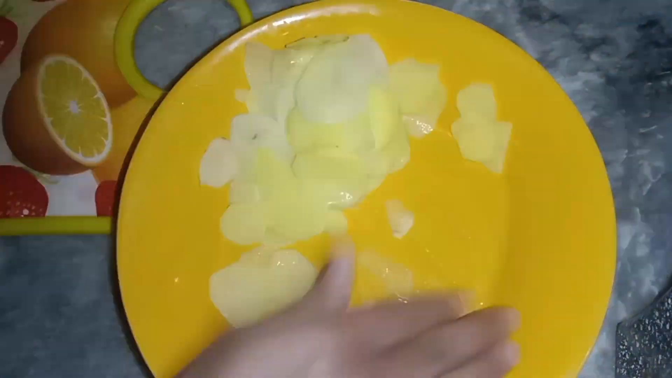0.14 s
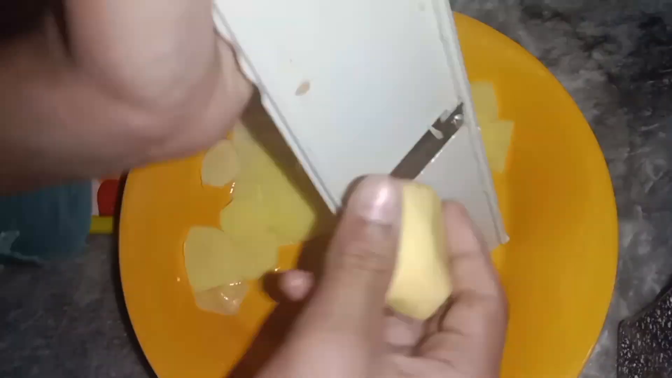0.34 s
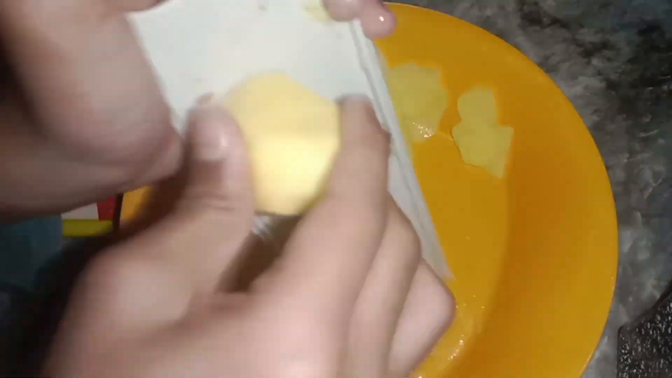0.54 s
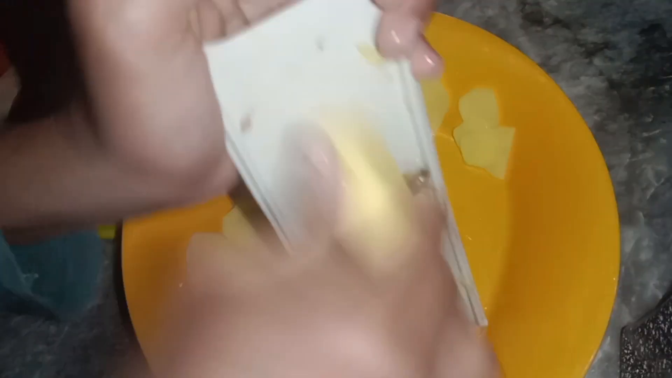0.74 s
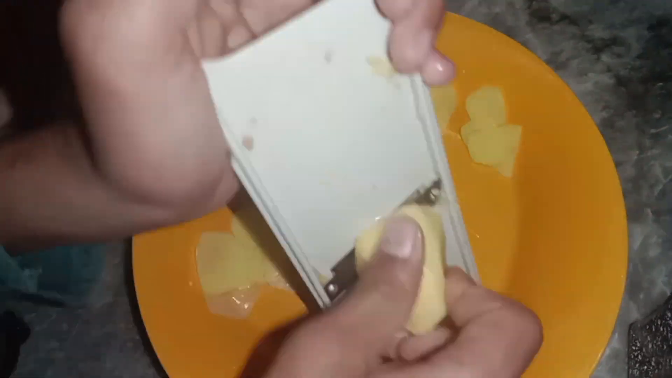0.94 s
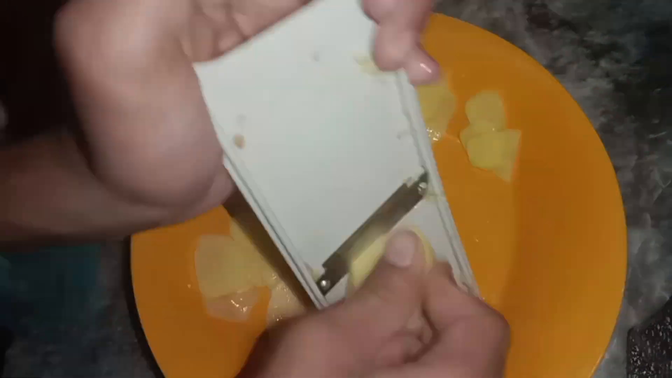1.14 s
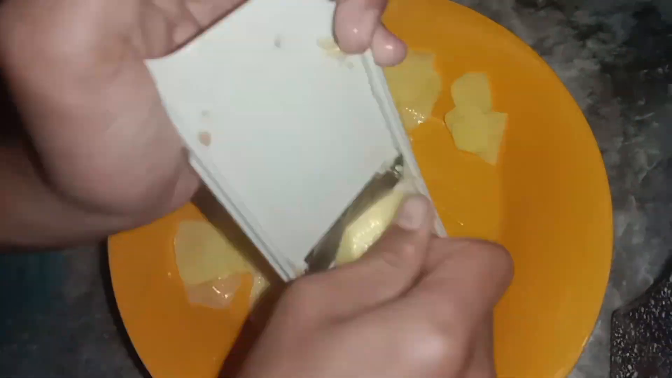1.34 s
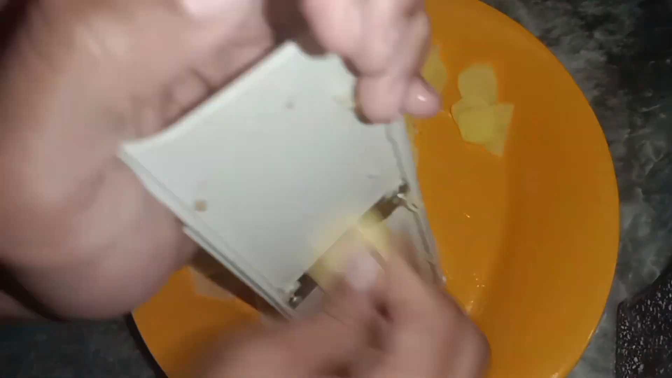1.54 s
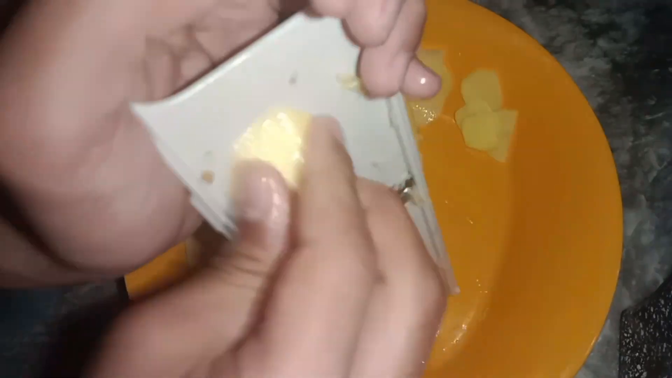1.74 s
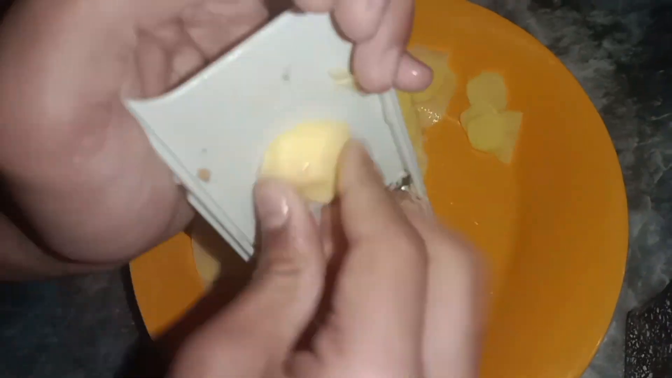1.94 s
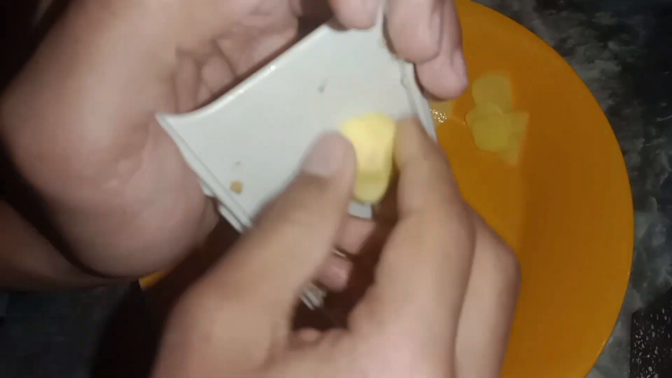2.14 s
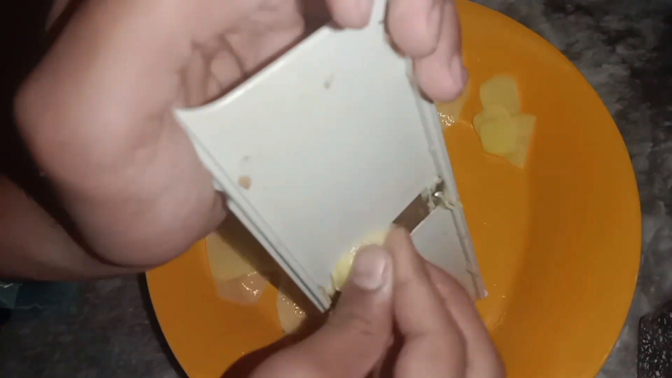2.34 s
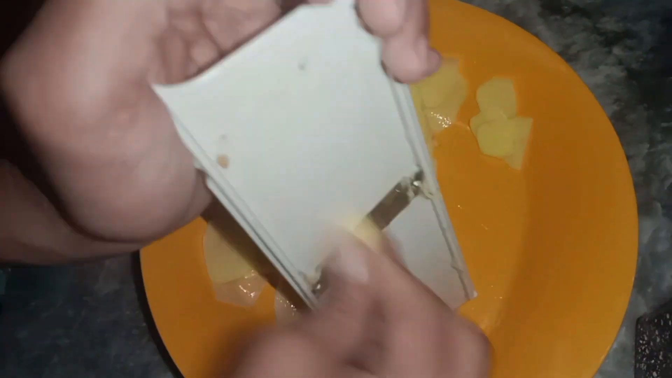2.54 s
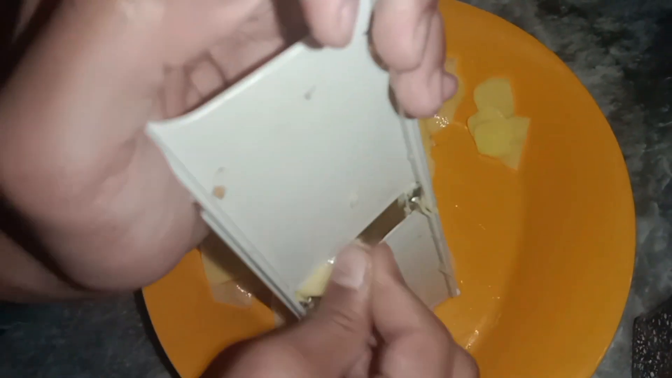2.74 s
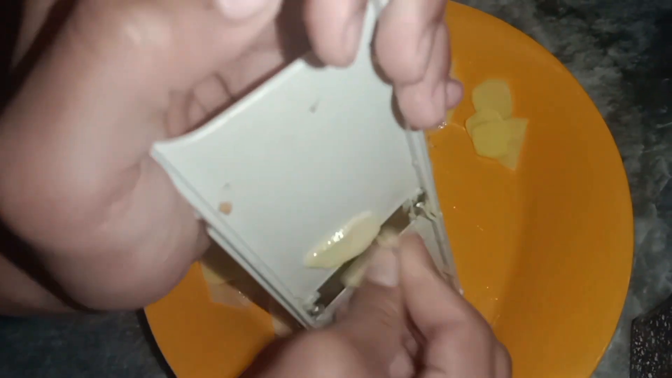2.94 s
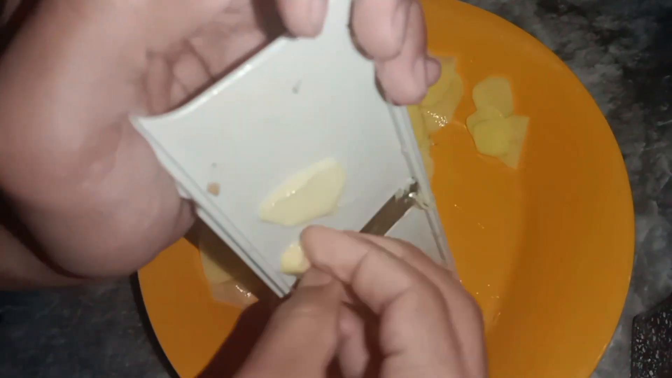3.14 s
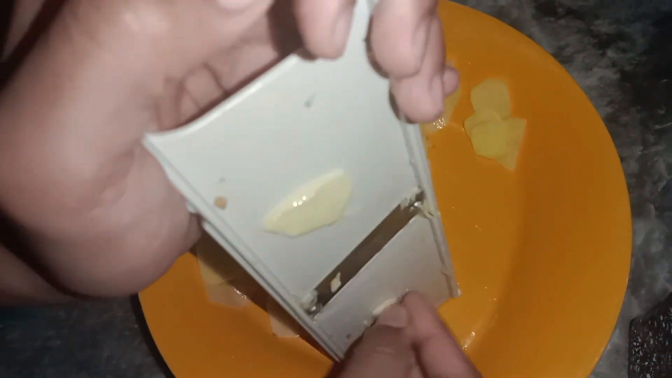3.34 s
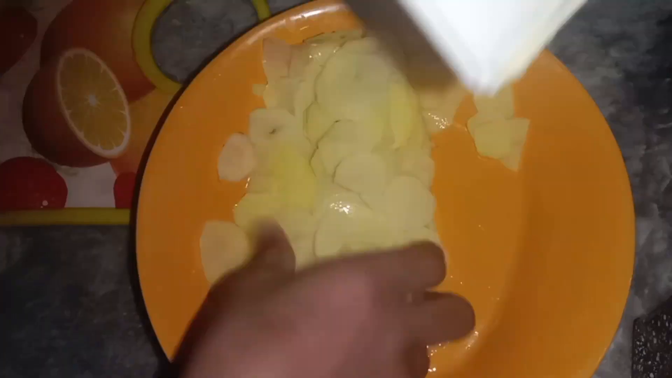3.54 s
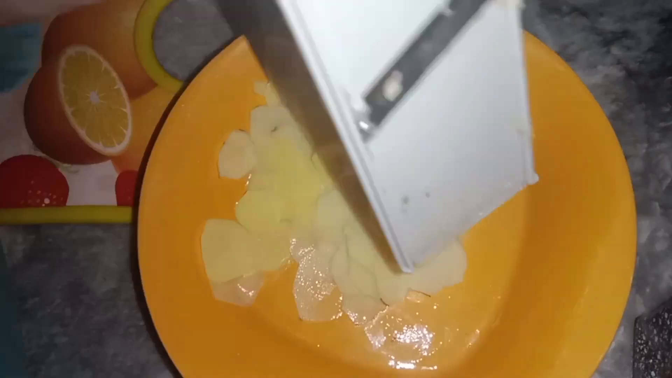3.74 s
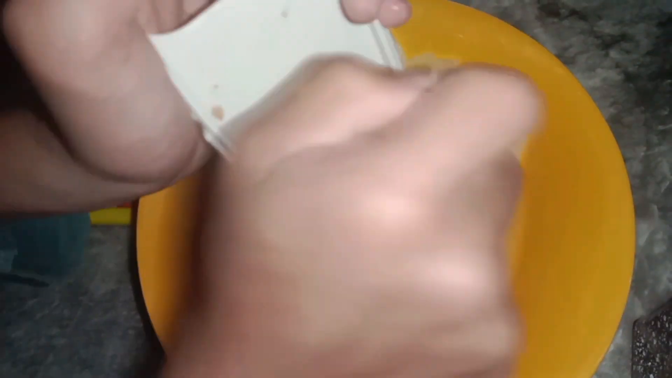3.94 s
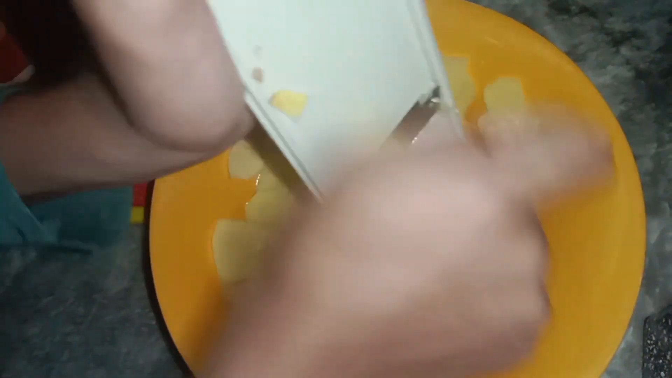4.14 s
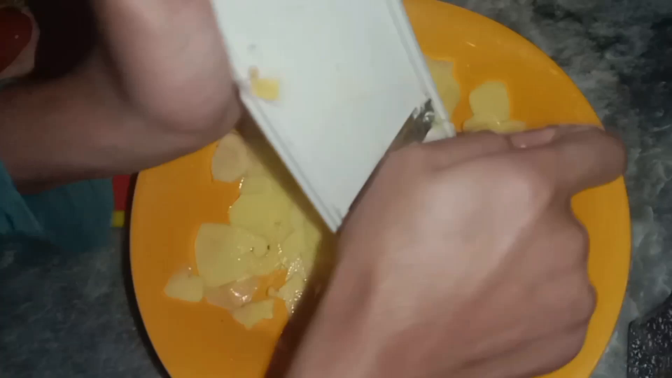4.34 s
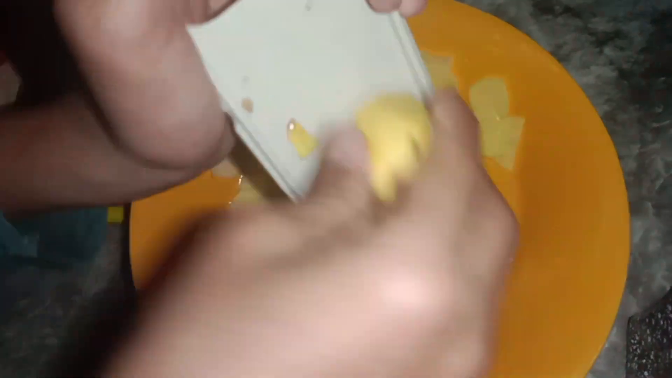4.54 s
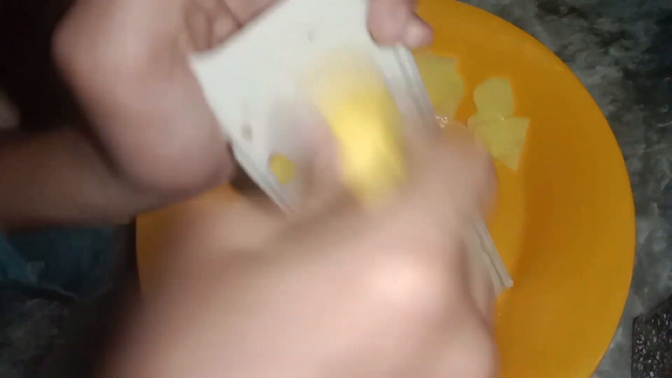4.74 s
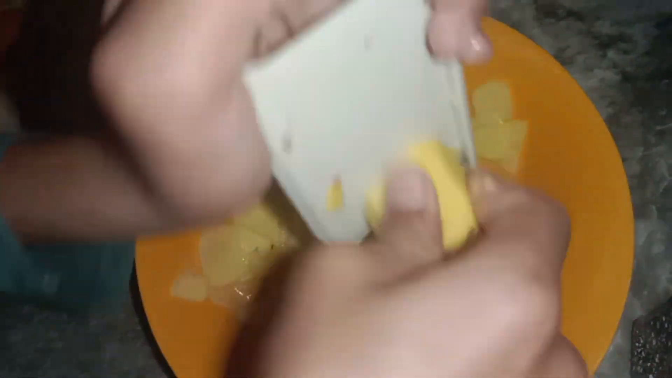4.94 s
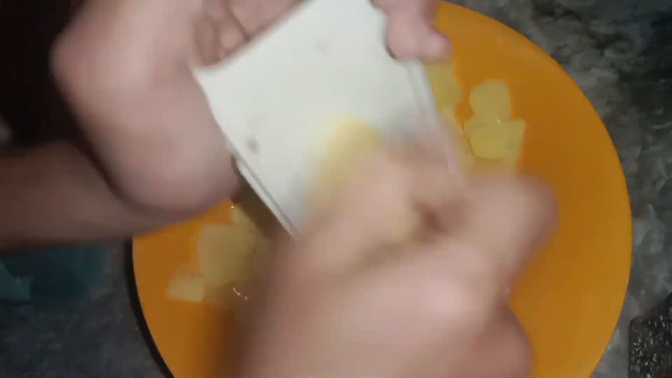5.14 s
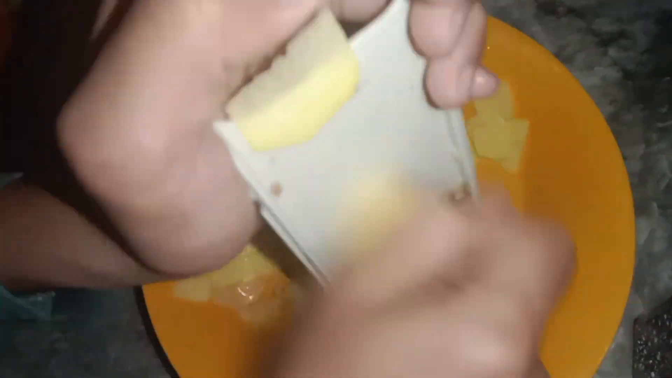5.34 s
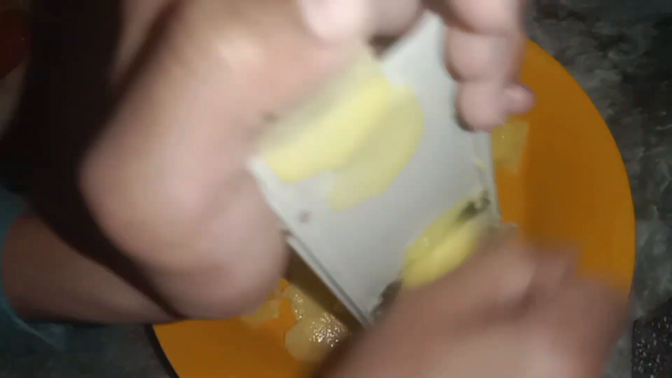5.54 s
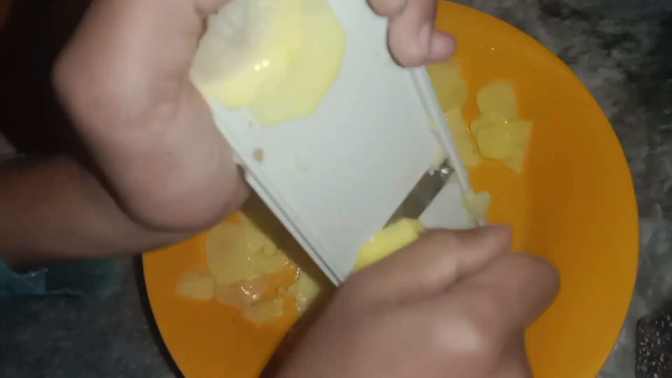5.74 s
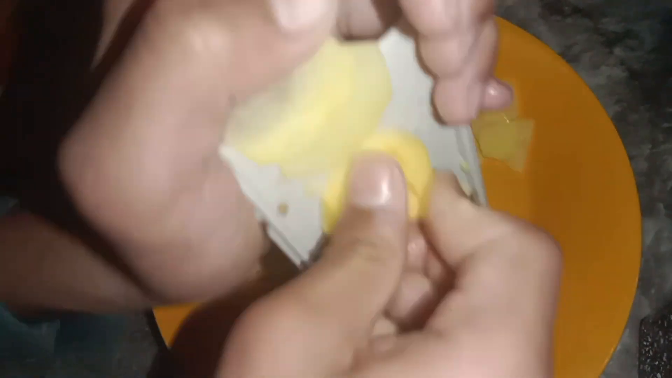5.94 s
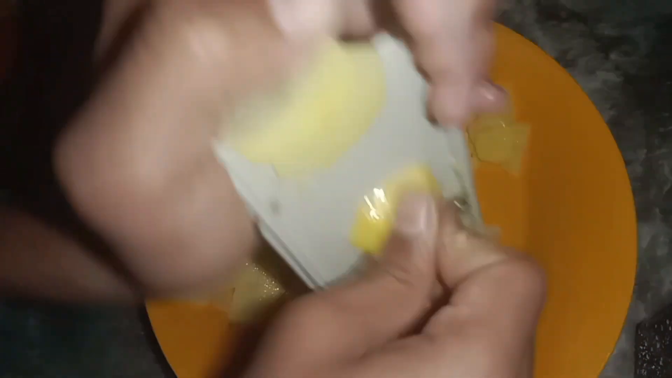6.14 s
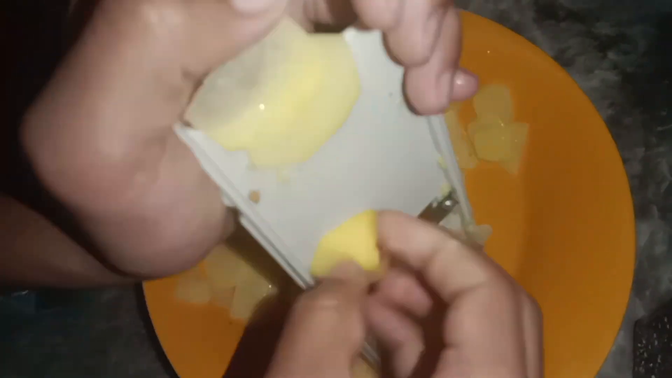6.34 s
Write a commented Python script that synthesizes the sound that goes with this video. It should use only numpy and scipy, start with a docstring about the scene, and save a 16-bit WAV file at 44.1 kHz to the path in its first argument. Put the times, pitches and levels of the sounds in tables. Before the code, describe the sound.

Very close and dry in a quiet kitchen, a raw potato is pushed over a hand-held plastic slicer. Near silence first, then a burst of rasping strokes with crisp snaps and chattering catches. Quieter flicks and dry knocks follow, fading almost away, until a low thud on the plate starts a louder run of scraping and stuttering slips that dwindles to tiny rubs.

```python
"""In a quiet kitchen, a raw potato is pushed to and fro over a hand-held plastic mandoline, close by.
Strokes and flicks are bursts of coloured crackle and noise: a rasp on the ramp, a hiss at the blade, a drone.
Catches are runs of jerks that ring the frame; snaps and dry knocks are short bursts through filters.
Hollow rubs, scuffs and a dull rumble follow the hands; low swings give the soft bumps and the thud on the plate."""
import sys
import numpy as np
from scipy import signal
from scipy.fft import rfft, irfft, next_fast_len
from scipy.io import wavfile
from scipy.ndimage import uniform_filter1d, map_coordinates

SR = 44100
rng = np.random.default_rng(int(sys.argv[2]) if len(sys.argv) > 2 else 0)


def bounce(signal):
    """Save signal as a 16-bit WAV file at the path given by the first command-line argument."""
    frames = np.transpose(np.atleast_2d(signal))
    limited = np.clip(frames, -1, 1)
    pcm = np.round(limited * 32767).astype(np.int16)
    wavfile.write(sys.argv[1], SR, pcm)


N = 285765  # length in samples
TOP_HZ = 15800  # upper band limit of the microphone

# how fast the kitchen's answer dies: [f/Hz, t60/s]
ROOM_DECAY = [(200, .16), (1500, 0.17), (8000, 0.18)]
# spells in which the hands shift their grip: [start t/s, end t/s, effort level/dB, swell over the spell/dB]
GRIP_SPELLS = [(.01, 0.393, -68.5, 15), (0.407, 0.757, -47, 5.5), (0.765, 0.943, -40, -12),
               (1.05, 1.45, -43, 5.5), (1.52, 1.867, -80, 1.5), (1.862, 2.042, -64.5, 15),
               (2.33, 2.827, -62, -22), (2.851, 3.746, -56.5, -1.5), (3.866, 4.209, -35, 8.5),
               (4.252, 4.441, -49.5, -17), (4.477, 4.756, -57.5, 3), (4.77, 5.025, -40.5, -4.5),
               (5.059, 5.78, -42.5, -4.5), (5.81, 6.11, -58, 16), (6.346, 6.48, -64.5, -2.5)]
# the clearest hollow rubs: [t/s, level before the rub trim/dB, f/Hz]
CLEAR_RUBS = [(.404, -38, 615), (0.938, -34.5, 585), (1.285, -30.5, 556), (1.429, -41, 676),
              (1.578, -43.5, 634), (1.96, -57, 713), (2.209, -46.5, 585), (2.35, -47.5, 282),
              (2.656, -51, 363), (2.762, -44, 410), (3.11, -44, 865), (3.155, -49, 694), (3.34, -52, 696),
              (3.39, -46, 219), (3.653, -41.5, 550), (3.936, -39, 306), (4.429, -42, 692), (4.28, -41, 448),
              (4.447, -45.5, 405), (4.83, -39, 500), (5.306, -43.5, 201), (5.355, -33.5, 573),
              (5.478, -31.5, 606), (5.946, -41.5, 770), (5.998, -39.5, 460), (6.075, -38, 554),
              (6.355, -61, 648), (6.463, -56, 704)]
# soft bumps of the slicer and the hands: [t/s, swing level before the onset/dB, f/Hz, t60/s]
SOFT_BUMPS = [(0.164, -39.5, 127.5, 0.061), (1.119, -41, 142, 0.036), (2.337, -38, 83, .06),
              (2.534, -31.5, 165, 0.033), (2.955, -37, 149, 0.052), (3.806, -20.5, 125, 0.069),
              (3.815, -13.5, 182, 0.12), (3.841, -15.5, 260, 0.041), (5.261, -15.5, 284, 0.025)]
# dry knocks of the potato on the frame: [t/s, peak level/dB]
DRY_KNOCKS = [(2.030, -32.5), (2.102, -23), (2.265, -63), (2.309, -30.5)]
# the blade bites in with a crisp snap: [t/s, peak level/dB, t60 of the burst/s]
BLADE_SNAPS = [(0.638, -22, 0.028), (0.742, -17.5, 0.0099), (0.757, -25.5, 0.012)]
# the potato catches and slips: [t/s, level over 10 ms/dB, f of jerks and frame focus/Hz, length before spread/s]
CATCHES = [(0.64, -13.5, 1110, 0.0019), (0.711, -23, 1211, 0.0021), (0.7417, -17.5, 1053, 0.00049),
           (0.7591, -19.5, 1168, 0.00063), (0.763, -16, 1542, 0.00095), (0.7845, -26, 1099, 0.01),
           (1.232, -29.5, 1013, 0.003), (1.261, -19, 1580, 0.0014), (3.8017, -26.5, 997, 0.003),
           (3.9808, -26.5, 1259, 0.0054), (4.114, -18.5, 1350, 0.00089), (4.1851, -26.5, 1770, 0.0016),
           (4.1884, -22.5, 1333, 0.006), (4.357, -24, 1267, 0.0045), (4.7581, -20, 1080, 0.0011),
           (4.7882, -21.5, 1170, 0.004), (4.914, -27, 1320, 0.0068), (4.95, -16.5, 1498, 0.00075),
           (5.125, -27.5, 2187, 0.001), (5.1585, -24.5, 1222, 0.0026), (5.4459, -15.5, 1850, 0.0013),
           (5.5348, -28.5, 1304, 0.0031), (5.546, -26, 1490, 0.002), (5.586, -22, 1510, 0.0014),
           (5.6317, -15.5, 1340, 0.003), (5.6559, -15, 1620, 0.0013), (5.7006, -14, 1450, 0.0015)]
# long pushes and pulls: [start t/s, end t/s, rasp level before trim/dB, hiss level before trim/dB,
# swell over the stroke/dB]
LONG_STROKES = [(0.058, 0.366, -78, -84, 2), (0.454, 0.607, -47.5, -52.5, -4.5),
                (.612, 0.735, -37.5, -43.5, 4), (0.754, 0.944, -38, -44, -7.5),
                (1.075, 1.311, -39.5, -44.5, -14.5), (1.308, 1.464, -43, -45.5, -12),
                (1.715, 1.853, -49, -52.5, 3.5), (2.409, 2.524, -45, -56, -9),
                (2.546, 2.699, -67.5, -67, -6), (2.719, 2.819, -44, -48, 20.5), (2.948, 3.05, -61, -64, -6),
                (3.236, 3.289, -65, -69, -9), (3.632, 3.731, -53, -62, -15), (3.929, 4.096, -42.5, -55, -6),
                (4.099, 4.376, -38.5, -47, -1.5), (4.643, 4.735, -42, -49, -2.5),
                (4.747, 4.852, -50, -55.5, 3), (4.863, 4.952, -30.5, -42.5, -4),
                (4.96, 5.025, -41.5, -52, 9), (5.065, 5.23, -40, -46.5, -5.5),
                (5.239, 5.404, -39.5, -47.5, -7.5), (5.423, 5.51, -42, -47.5, -7.5),
                (5.556, 5.803, -38, -50, -12), (5.883, 5.925, -59.5, -61, 0),
                (5.909, 6.054, -49, -54, -6.5)]
# short flicks over the blade: [middle t/s, length/s, rasp level before trim/dB, hiss level before trim/dB]
SHORT_FLICKS = [(0.111, 0.018, -66.5, -73.5), (.17, 0.018, -61.5, -83), (0.259, 0.036, -70, -73.5),
                (0.315, .014, -57, -74), (0.423, 0.032, -54, -71), (0.496, 0.018, -44, -48.5),
                (0.713, 0.0087, -29.5, -36.5), (1.058, 0.014, -36.5, -41.5), (1.15, 0.01, -39.5, -41.5),
                (1.429, 0.01, -43, -33.5), (1.53, 0.023, -44, -43.5), (1.582, 0.049, -44, -46),
                (1.663, 0.0066, -43.5, -55.5), (1.768, 0.0063, -34, -36), (1.828, .024, -39, -45.5),
                (2.01, 0.016, -42, -54.5), (2.2, 0.031, -47.5, -61), (2.337, 0.019, -41.5, -46.5),
                (2.49, 0.0097, -40.5, -41.5), (2.576, 0.021, -46, -46.5), (2.621, 0.036, -56, -52),
                (2.671, 0.023, -43, -42.5), (2.89, 0.013, -49, -48), (2.917, 0.0088, -49.5, -55.5),
                (3.153, 0.015, -68, -77), (3.215, 0.014, -41.5, -45), (3.342, 0.027, -77, -68),
                (3.428, 0.016, -47, -58), (3.544, 0.022, -63, -70.5), (3.732, 0.015, -43.5, -49),
                (3.818, .045, -35, -53.5), (4.342, .04, -35.5, -47.5), (4.602, 0.031, -41, -47.5),
                (5.123, .018, -35.5, -43.5), (5.195, 0.014, -32, -39), (5.431, 0.036, -50, -47.5),
                (5.737, .016, -31.5, -38.5), (5.791, 0.018, -47, -49), (5.979, .01, -30.5, -38),
                (6.017, 0.003, -36.5, -43.5), (6.043, .006, -64, -42.5), (6.082, 0.01, -31, -36.5),
                (6.121, 0.03, -47, -45.5), (6.17, 0.022, -40.5, -37.5), (6.441, 0.005, -49, -51)]

# colour of hollow drone, rumble and puff: [f/Hz, relative level/dB]
HOLLOW_COLOUR = [(30, -33.5), (80, -15), (160, -3), (260, -15), (450, 0), (720, -6), (950, -12.5),
                 (1500, -20.5), (3000, -71.5)]
# colour of flesh on the ramp and of finger scuffs: [f/Hz, relative level/dB]
RASP_COLOUR = [(30, -32), (70, -19), (150, -3), (300, -14), (600, -4.5), (900, -5.5), (1300, 3),
               (1700, -1.5), (2200, 3.5), (2700, -7.5), (3300, -12), (4500, -29), (8000, -61.5)]
# colour of wet flesh at the blade: [f/Hz, relative level/dB]
HISS_COLOUR = [(1000, -45.5), (2500, 2.5), (3500, -2.5), (4900, -5.5), (5500, -0.5), (6000, 7), (6600, -2),
               (7400, -4.5), (8300, -16), (9400, -42), (10500, -27.5), (15500, -29)]
# how readily the plastic frame speaks: [f/Hz, relative level/dB]
FRAME_COLOUR = [(40, -25.5), (150, -5.5), (350, 6), (600, 14.5), (850, -2.5), (1350, 0.5), (1700, -6.5),
                (2150, -1), (2650, -21.5), (3200, -11), (3800, -31.5), (6000, -24), (9000, -55),
                (15000, -62.5)]
# colour of a dry knock: [f/Hz, relative level/dB]
KNOCK_COLOUR = [(30, -20), (120, -3), (400, -1.5), (700, 7), (1200, -8.5), (1800, -36), (5000, -35),
                (9000, -70)]
# colour of a snap at the edge: [f/Hz, relative level/dB]
SNAP_COLOUR = [(800, -10.5), (2000, 1), (3500, 1), (5000, -8.5), (6000, -3), (7500, -12.5), (9400, -40.5),
               (15000, -31)]


def amp(db):
    """Decibels to linear gain."""
    return 10 ** (np.asarray(db) / 20)


def unit(x):
    """x scaled to rms 1."""
    return x / np.sqrt(np.mean(x ** 2) + 1e-20)


def along(points, hz):
    """Read a curve of (Hz, value) points on a log frequency axis."""
    f, value = np.transpose(points)
    return np.interp(np.log(hz + 1), np.log(f + 1), value)


def wobble(rate):
    """A smooth random curve with the given number of knots a second."""
    knots = rng.standard_normal(int(N * rate / SR) + 4)
    return map_coordinates(knots, [np.arange(N) * rate / SR])


def filtered(x, response):
    """x with its spectrum multiplied by a function of frequency."""
    size = next_fast_len(N + SR // 2)
    return irfft(rfft(x, size) * response(np.fft.rfftfreq(size, 1 / SR)), size)[:N]


def coloured(x, spectrum):
    """x shaped by a table of relative levels, at rms 1."""
    return unit(filtered(x, lambda hz: amp(along(spectrum, hz))))


def ring(db_of, size=2048):
    """The causal (minimum-phase) impulse response of a body whose gain is db_of(Hz)."""
    cepstrum = irfft(np.log(amp(db_of(np.fft.rfftfreq(size, 1 / SR)))))
    # fold the mirrored half forward, so that nothing sounds before the blow
    cepstrum[1:size // 2] *= 2
    cepstrum[size // 2 + 1:] = 0
    return irfft(np.exp(rfft(cepstrum)))


def add(track, s, sound):
    """Mix a sound into the track at s seconds."""
    i = max(round(s * SR), 0)
    track[i:i + len(sound)] += sound[:max(N - i, 0)]


def crackle(rate, spread_db):
    """Tiny ruptures at random times, rate a second on average, of uneven size, at rms 1."""
    happens = rng.random(N) < rate / SR
    size = rng.standard_normal(N) * amp(spread_db * rng.standard_normal(N))
    return unit(happens * size)


def patchy(x, depth_db, size):
    """Resonances that come and go: a random gain field, smooth in time and frequency."""
    z = signal.stft(x, nperseg=size)[2]
    field = uniform_filter1d(rng.standard_normal(z.shape), size=3, axis=0)
    field = uniform_filter1d(field, size=4, axis=1)
    return signal.istft(z * amp(depth_db * unit(field)), nperseg=size)[1][:N]


def stroke_gain(start, end, swell_db, attack, release):
    """Contact builds and lets go over a few milliseconds; in between the pressure swells or fades."""
    t = np.arange(N) / SR
    i, j = np.searchsorted(t, [start - .1, end + .1])  # room for the soft edges
    t = t[i:j]
    contact = (1 + np.tanh((t - start) / attack)) * (1 + np.tanh((end - t) / release))
    pressure = amp(np.interp(t, [start, end], [0, swell_db]))
    return slice(i, j), contact * pressure


def quiet_floor(level_db=-89.5):
    """Steady soft noise, weaker towards the treble, lies under everything."""
    colour = [(50, -8), (700, -8.0), (3000, -14.5), (7000, -15.5), (10000, -31.5)]  # Hz, relative dB
    return amp(level_db) * coloured(rng.standard_normal(N), colour)


def kitchen(x):
    """Worktop and walls answer briefly: x through noise that decays at its own pace in each band."""
    hz, t, z = signal.stft(rng.standard_normal(SR // 4), SR, nperseg=256)
    decay = amp(-60 * t / along(ROOM_DECAY, hz)[:, None])
    tail = signal.istft(z * decay, SR, nperseg=256)[1]
    return signal.fftconvolve(x, tail / np.linalg.norm(tail))[:N]


def grip_effort(attack=.012, release=0.0091):
    """How hard the hands work on the frame: each spell sets in, swells or fades, and lets go."""
    effort = np.zeros(N)
    for start, end, db, swell_db in GRIP_SPELLS:
        span, gain = stroke_gain(start, end, swell_db, attack, release)
        effort[span] += amp(db) * unit(gain)
    return effort


def handling(effort, rumble_db=-5, unrest_db=4.5, scuff_db=-19, scuff_swing_db=12):
    """The shifting grip makes a dull, restless rumble, and the fingers scuff faintly now and then."""
    drone = patchy(rng.standard_normal(N), depth_db=8.0, size=1024)
    rumble = coloured(drone, HOLLOW_COLOUR) * unit(amp(unrest_db * wobble(30)))
    grains = patchy(crackle(rate=830, spread_db=0.5), depth_db=8.5, size=512)
    scuffs = coloured(grains, RASP_COLOUR) * unit(amp(scuff_swing_db * np.tanh(wobble(32))))
    return effort * (amp(rumble_db) * rumble + amp(scuff_db) * scuffs)


def small_rubs(effort, level_db=-1, scatter_db=4.0, pitch_hz=520, spread_octaves=.5, count=110):
    """Lesser rubs at uneven intervals follow the grip's strength: rows of t/s, level/dB, f/Hz."""
    at = ((np.arange(count) + rng.random(count)) * (N - 1) / count).astype(int)
    size, place = rng.standard_normal((count, 2)).T
    db = 20 * np.log10(effort[at] + 1e-9) + level_db + scatter_db * size
    return list(zip(at / SR, db, pitch_hz * 2 ** (spread_octaves * place)))


def rubs(effort, skirt_db=-30, length=0.011, width_hz=80, trim_db=1):
    """A brief swell of friction sounds one hollow resonance over a faint rasp."""
    out = np.zeros(N)
    t = np.arange(-SR // 16, SR // 16) / SR
    hz = np.fft.rfftfreq(len(t), 1 / SR)
    swell = np.exp(-(t / length) ** 2)
    for s, db, pitch_hz in small_rubs(effort) + CLEAR_RUBS:
        resonance = np.minimum(hz / pitch_hz, 1) / (1 + ((hz - pitch_hz) / width_hz) ** 2)
        colour = resonance + amp(skirt_db + along(RASP_COLOUR, hz))
        friction = irfft(rfft(rng.standard_normal(len(t))) * colour, len(t))
        rub = swell * friction
        add(out, s + t[0], amp(db + trim_db) * rub * np.linalg.norm(swell) / np.linalg.norm(rub))
    return out


def bumps(attack=0.0047, thump_db=-6):
    """A soft contact gives one low, quickly damped swing and a dull puff."""
    out = np.zeros(N)
    t = np.arange(SR // 5) / SR
    puff = coloured(rng.standard_normal(N), HOLLOW_COLOUR)
    for s, db, hz, t60 in SOFT_BUMPS:
        swing = np.sin(2 * np.pi * hz * t)
        thump = amp(thump_db) * puff[round(s * SR):][:len(t)]
        envelope = amp(db - 60 * t / t60) * (1 - np.exp(-t / attack))
        add(out, s, envelope * (swing + thump))
    return out


def knocks():
    """Potato on frame: one broad, dull push that hardly rings."""
    out = np.zeros(N)
    push = ring(lambda hz: along(KNOCK_COLOUR, hz))
    for s, db in DRY_KNOCKS:
        add(out, s, amp(db) * push / np.max(np.abs(push)))
    return out


def snaps():
    """Firm flesh splits at the edge: a bright burst that dies within milliseconds."""
    out = np.zeros(N)
    t = np.arange(SR // 25) / SR
    edge = ring(lambda hz: along(SNAP_COLOUR, hz))
    for s, db, t60 in BLADE_SNAPS:
        split = rng.standard_normal(len(t)) * amp(-60 * t / t60)
        burst = signal.fftconvolve(split, edge)
        add(out, s, amp(db) * burst / np.max(np.abs(burst)))
    return out


def slips(jitter=.24, focus_db=7.5, skirt_db=14, spread=2.3, follow=0.054, tail=0.0017,
          lead_in=1.8, jerk_spread_db=3.06, count=24):
    """Stick-slip: a run of jerks, roughly in step with the frame's swing, builds to a peak and dies."""
    out = np.zeros(N)
    lead = .02  # seconds kept free ahead of the peak
    for s, db, pitch_hz, length in CATCHES:
        when = np.cumsum(np.exp(jitter * rng.standard_normal(count))) / pitch_hz
        when -= when[count // 3]  # the peak falls at zero
        sizes = np.exp(-np.abs(when) / (length * spread)) * (when >= -lead_in * length)
        sizes += follow * (when > 0) * np.exp(-np.abs(when) / tail)  # weak jerks trail behind
        sizes *= amp(jerk_spread_db * rng.standard_normal(count))
        jerks = np.bincount(np.maximum((when + lead) * SR, 0).astype(int), sizes)

        def focused(hz):
            """The place of contact decides which part of the frame's range speaks."""
            away = focus_db * np.log2((hz + 1) / pitch_hz) ** 2
            return along(FRAME_COLOUR, hz) - np.minimum(away, skirt_db)

        chatter = signal.fftconvolve(jerks, ring(focused))
        # level held as rms over 10 ms
        add(out, s - lead - .0004, amp(db) * chatter * np.sqrt(SR / 100) / np.linalg.norm(chatter))
    return out


def caught(pause_db, width):
    """While the potato is caught it hardly slides, so the blade goes quieter."""
    t = np.arange(N) / SR
    stuck = np.zeros(N)
    for s, db, _, _ in CATCHES:
        i, j = np.searchsorted(t, [s - .05, s + .05])
        stuck[i:j] += min(amp(db + 20.0), 1) * np.exp(-((t[i:j] - s) / width) ** 2)
    return amp(pause_db * np.minimum(stuck, 1))


def scraping(attack=0.0066, release=0.0047, clump_db=3.0, judder_db=2.5, unsteady_db=2.0,
             rasp_trim_db=-0.32, hiss_trim_db=0.0, hollow_db=-9):
    """Cells tear in clumps: ramp rasps, frame drones and wet blade hisses, in shifting colours."""
    grip = amp(unsteady_db * wobble(28) + clump_db * wobble(85) + judder_db * wobble(320))
    tears = crackle(rate=5500, spread_db=0.37)
    rasp = coloured(patchy(grip * tears, depth_db=7.0, size=512), RASP_COLOUR)
    wet = grip * (.5 * tears + rng.standard_normal(N))
    hiss = coloured(patchy(wet, depth_db=4.0, size=256), HISS_COLOUR)
    hiss = hiss * caught(pause_db=-2.5, width=0.02)
    drone = coloured(patchy(rng.standard_normal(N), depth_db=7.5, size=1024), HOLLOW_COLOUR)

    flicks = [(middle - length / 2, middle + length / 2, ramp_db, blade_db, 0)
              for middle, length, ramp_db, blade_db in SHORT_FLICKS]
    out = np.zeros(N)
    for start, end, ramp_db, blade_db, swell_db in LONG_STROKES + flicks:
        span, gain = stroke_gain(start, end, swell_db, attack, release)
        layers = ((rasp, ramp_db + rasp_trim_db), (drone, ramp_db + hollow_db),
                  (hiss, blade_db + hiss_trim_db))
        for texture, db in layers:
            rub = gain * texture[span]
            # level held as rms over the stroke's own length
            out[span] += amp(db) * rub * np.sqrt(abs(end - start) * SR) / np.linalg.norm(rub)
    return out


def scene():
    """Slicer and hands close by, with the kitchen's faint answer and a quiet floor."""
    effort = grip_effort()
    hands = handling(effort) + rubs(effort)
    contacts = bumps() + knocks() + snaps()
    slicer = hands + contacts + slips() + scraping()
    return (quiet_floor() + amp(-32.5) * kitchen(slicer) + slicer)[None]


def record(dry):
    """The microphone keeps nothing above its band limit."""
    return filtered(dry[0], lambda hz: hz < TOP_HZ)[None]


dry = scene()
out = record(dry)
bounce(out)
```